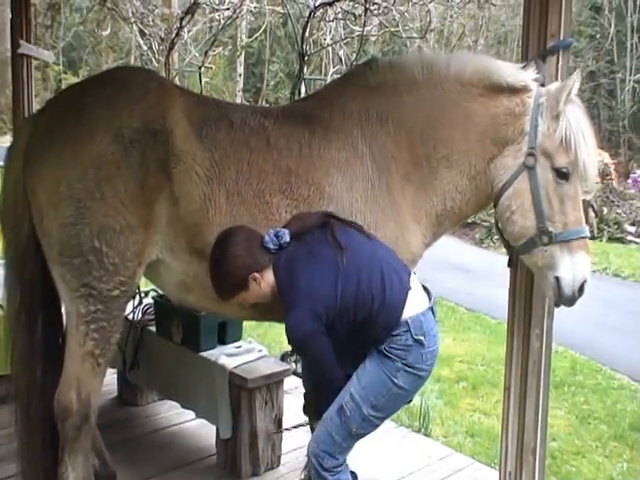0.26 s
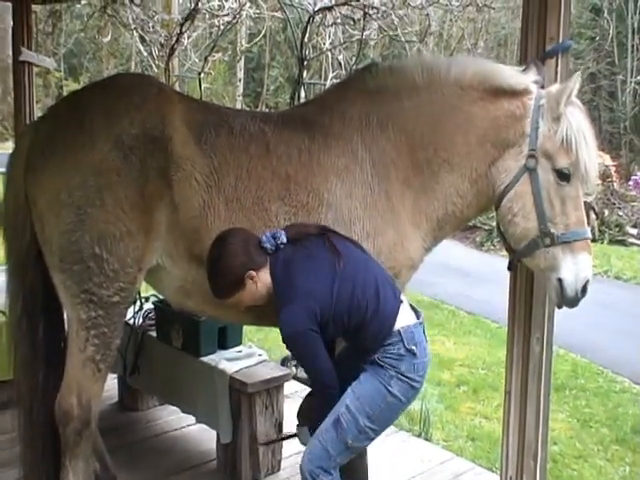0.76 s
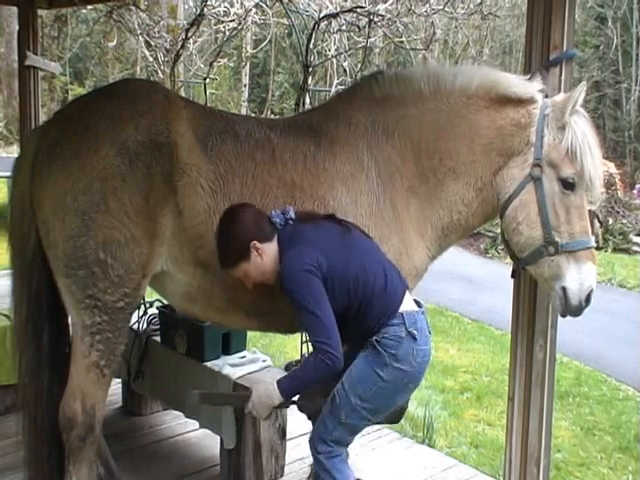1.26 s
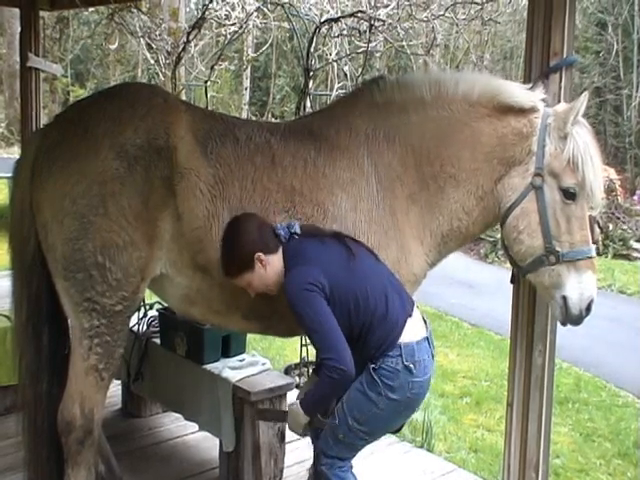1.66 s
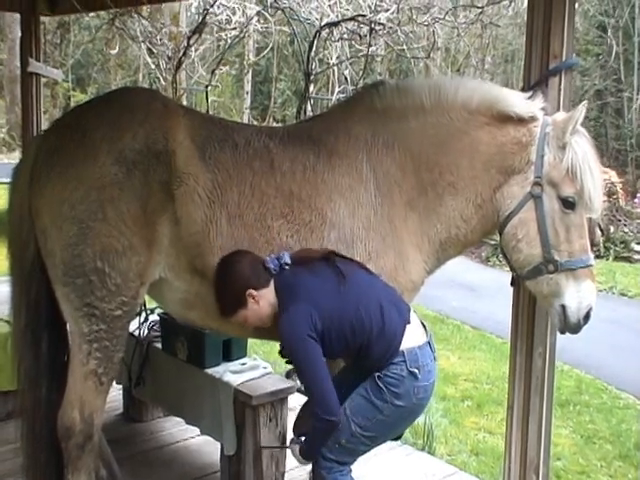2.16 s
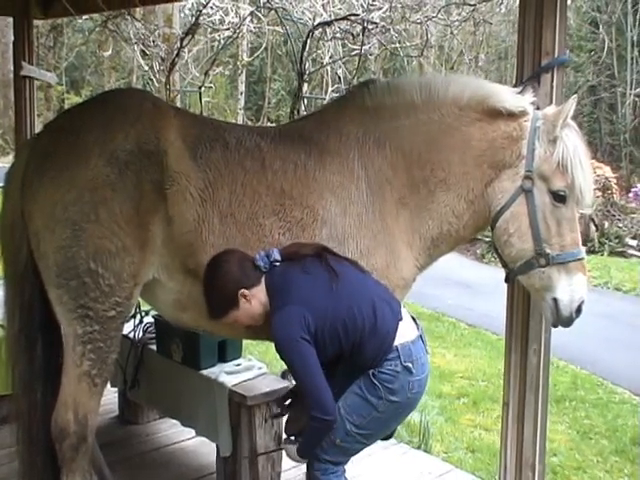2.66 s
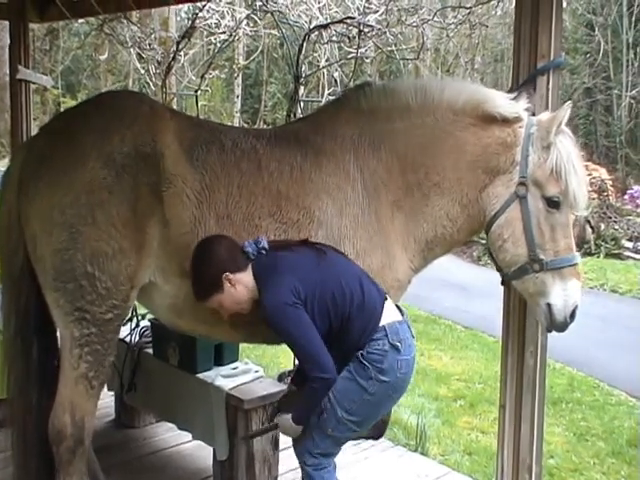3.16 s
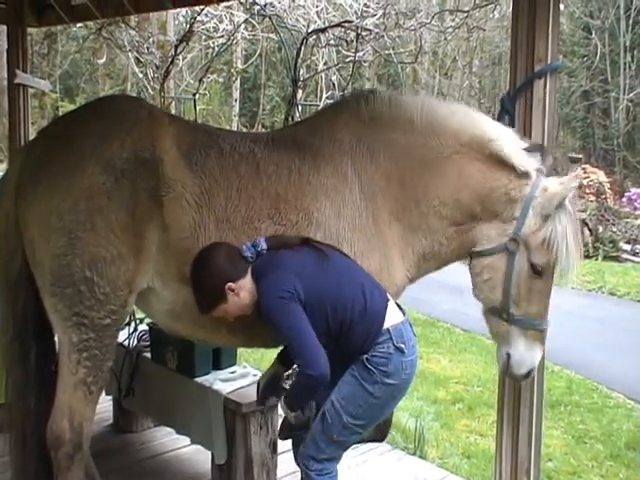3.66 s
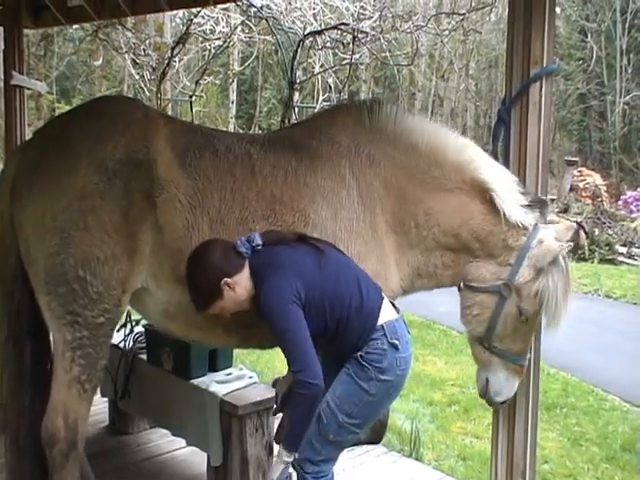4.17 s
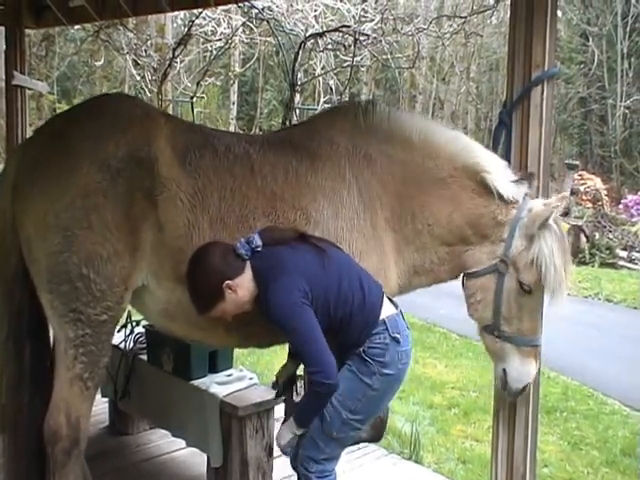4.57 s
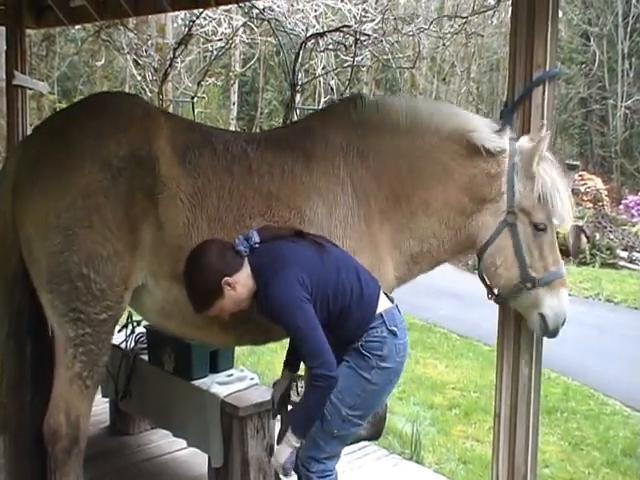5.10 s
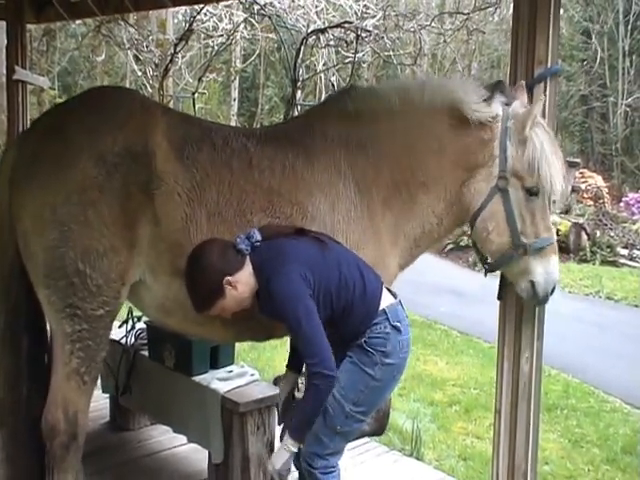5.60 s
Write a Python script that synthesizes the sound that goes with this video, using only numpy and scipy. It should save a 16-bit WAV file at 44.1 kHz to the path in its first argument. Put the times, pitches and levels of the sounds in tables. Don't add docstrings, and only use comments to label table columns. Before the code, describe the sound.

Four sharp hoof thuds on planks with boot shuffles, a quick glove wipe, then gritty metallic filing bursts against quiet outdoor hum.

```python
import sys
import numpy as np
from scipy import signal
from scipy.fft import rfft, irfft, next_fast_len
from scipy.io import wavfile

SR = 44100
rng = np.random.default_rng(int(sys.argv[2]) if len(sys.argv) > 2 else 0)


def wav_record(signal):
    frames = np.transpose(np.atleast_2d(signal))
    bounded = np.clip(frames, -1, 1)
    quanta = np.round(bounded * 32767).astype(np.int16)
    wavfile.write(sys.argv[1], SR, quanta)


def gain_from_decibels(decibels):
    exponent = np.asarray(decibels, float) / 20
    return 10 ** exponent


N = 257544

# [start t/s, swell t/s, fade t/s, grind level/dB, hoof level/dB]
RASP_STROKES = [(3.475, 0.014, 0.028, -60, -69), (3.57, 0.011, 0.025, -61, -74),
                (4.031, 0.081, 0.036, -41, -53.5), (4.15, .02, 0.054, -64, -71),
                (4.295, 0.017, 0.023, -61, -79), (4.435, 0.047, 0.024, -41, -56),
                (4.49, 0.034, 0.054, -41.5, -56), (4.722, 0.01, 0.067, -46.5, -54),
                (4.836, .002, .012, -49, -60), (4.849, .003, 0.011, -47, -62),
                (4.858, 0.0036, 0.019, -44.5, -48), (4.877, 0.0073, 0.015, -42, -59),
                (4.894, 0.02, 0.0097, -42, -48.5), (4.918, 0.017, 0.053, -42.5, -55.5),
                (4.968, 0.013, .014, -53, -60), (4.985, .015, 0.042, -56.5, -64),
                (5.224, 0.0092, 0.029, -50.5, -49), (5.305, 0.043, 0.07, -41, -58),
                (5.36, 0.04, 0.054, -45, -61), (5.635, 0.008, 0.028, -53, -62),
                (5.705, .01, 0.026, -48.5, -61), (5.73, 0.01, 0.015, -49.5, -62),
                (5.745, 0.062, 0.09, -40.5, -56.5)]
# [f/Hz, level/dB per Hz]
GRIND_TONE = [(760, -7.5), (1300, -8), (1740, -6.5), (2700, -0.5), (3530, -6), (4690, -3), (5700, -8.5),
              (7000, -9.5), (9800, -16), (12300, -13), (14400, -23), (15800, -32)]
# [f/Hz, level/dB per Hz]
HOOF_TONE = [(120, -9), (200, -4.5), (483, -3.5), (705, 3), (1010, -8.5), (1290, -9), (1800, -22),
             (2340, -11.5), (3960, -120)]
# [f/Hz, width f/Hz, level/dB]
BAR_MODES = [(1615, 25, -5), (2250, 60, -2), (2550, 50, -4), (3008, 28, -1), (3866, 28, -1), (4640, 40, -8),
             (4768, 30, -1), (5524, 30, -4), (5741, 28, -1), (6660, 40, -12), (6920, 40, -13),
             (7850, 45, -12), (8170, 50, -15), (11600, 70, -16)]
# [t/s, mode f/Hz, peak level/dB, t60 t/s]
TOOTH_CATCHES = [(4.059, 2220, -53.6, 0.07), (4.076, 5741, -43, 0.045), (4.091, 3850, -54, 0.11),
                 (4.092, 4768, -48, 0.04), (4.099, 5524, -53.1, 0.058), (4.101, 5741, -44, 0.049),
                 (4.107, 3008, -51, 0.091), (4.107, 2250, -49, 0.077), (4.115, 4800, -60, 0.051),
                 (4.453, 4800, -55.4, 0.148), (4.472, 5570, -50.9, 0.071), (4.472, 5741, -46, 0.078),
                 (4.489, 4700, -48, 0.04), (4.503, 4720, -51, 0.046), (4.519, 3008, -41, 0.04),
                 (4.533, 2530, -44, 0.04), (4.843, 7850, -55, 0.048), (4.859, 4700, -54.5, 0.04),
                 (4.882, 2550, -50, 0.095), (4.882, 3008, -44, 0.04), (4.901, 2990, -53, 0.157),
                 (4.91, 4768, -57, 0.036), (5.226, 3866, -53.5, 0.1), (5.243, 1615, -48, 0.046),
                 (5.327, 4840, -51, 0.07), (5.346, 3800, -51.5, 0.04), (5.348, 4800, -55, 0.3),
                 (5.357, 5741, -46, 0.067), (5.359, 3040, -53, 0.089), (5.373, 1615, -49.5, 0.12),
                 (5.375, 2180, -59, 0.04), (5.384, 5741, -43, 0.04), (5.39, 4768, -49.8, 0.04),
                 (5.391, 2550, -47.7, 0.058), (5.404, 5524, -40, 0.044), (5.731, 3008, -47, 0.04),
                 (5.75, 3900, -52.7, 0.061), (5.755, 2220, -40.5, 0.046), (5.769, 4768, -48.5, 0.11),
                 (5.772, 2980, -51, 0.135), (5.776, 3866, -44, 0.04), (5.78, 2230, -45, 0.036),
                 (5.8, 3820, -45, 0.04), (5.802, 5524, -52, 0.04), (5.802, 5741, -54.8, 0.04),
                 (5.811, 3008, -53, 0.049), (5.82, 5550, -45, 0.092), (5.819, 5800, -52.2, 0.085)]
# [t/s, mode f/Hz, peak level/dB, t60 t/s]
LIFT_OFF_RINGS = [(4.036, 5741, -57, .15), (4.125, 4768, -60, 0.11), (4.13, 6660, -66, .1),
                  (4.437, 4768, -55, .1), (4.508, 5741, -55, .12), (4.553, 5741, -56, 0.073),
                  (4.557, 3866, -61, 0.14), (4.591, 3866, -64, .15), (4.733, 5741, -63, 0.34),
                  (4.738, 4768, -58, 0.12), (4.727, 3866, -56, 0.15), (4.732, 7850, -68, 0.11),
                  (4.737, 2550, -57, 0.2), (4.851, 5741, -58, .15), (4.924, 2550, -50, 0.14),
                  (4.929, 6660, -61, 0.25), (4.978, 3866, -61, .1), (4.997, 3866, -61, .12),
                  (4.99, 5524, -63, .2), (5.025, 5524, -66, 0.21), (5.226, 4768, -57, .07),
                  (5.232, 5741, -64, .15), (5.644, 4768, -61.5, 0.16), (5.703, 5741, -63, 0.11),
                  (5.72, 3866, -56.5, .2)]
# [t/s, peak level/dB, crack level/dB, joist thump level/dB, contact f/Hz]
HOOF_BLOWS = [
    (0.1628, -12, -10.5, -18, 3960),
    (0.9211, -21, -11, 5.5, 4440),
    (2.4115, -20.5, 0, -18, 4950),
    (2.7909, -13, -18, 3, 3630),
]
# [f/Hz, level/dB, t60 t/s]
BOARD_MODES = [
    [(165.4, -5.5, 0.4), (319, -4.5, 0.22), (371, -8.5, 0.28), (578, -4, 0.18), (633, 2.5, 0.083),
     (966, -9, 0.16), (1230, -15, 0.25), (1566, -17.5, 0.33), (1972, -18, .14)],
    [(380, 4, 0.081), (590, -3.5, 0.082), (698, -0.5, 0.094), (938, -13, 0.14), (1130, -13.5, 0.36),
     (1760, -9, .08)],
    [(161, -3, 0.085), (319, 1, 0.17), (644, -1, 0.13), (900, -2, 0.065), (1460, -18, 0.11)],
    [(155.4, -9.5, 0.43), (228.4, -12, 0.37), (316.5, 0, 0.27), (1360, -24, 0.14), (624, -7, 0.1),
     (716, 11.5, 0.018), (846, -7, 0.11), (1030, -13, 0.12), (1965, -12, .12)],
]
# [f/Hz, level/dB per Hz]
FLOOR_RATTLES = [
    [(59, -35), (100, -10), (183, -7.5), (475, -12.5), (590, -5.5), (1540, -10), (4000, -50), (5200, -80),
     (8800, -120)],
    [(59, -30), (100, -9.5), (923, -12), (2160, -8.5), (2370, -28), (2980, -30), (4000, -44), (5200, -69),
     (8800, -120)],
    [(59, -35), (100, -16), (328, -16), (513, -14.5), (760, -7), (1300, -17), (4000, -26), (5200, -57),
     (8800, -120)],
    [(59, -38), (100, -11), (328, -9), (563, -14), (868, -6.5), (1500, -8.5), (4000, -42), (5200, -79),
     (8800, -120)],
]
# [f/Hz, t60 t/s]
RATTLE_DECAY = [(120, 1), (400, 0.41), (1000, 0.13), (3000, 0.064)]
# [f/Hz, level/dB, t60 t/s]
JOIST_MODES = [(44.8, -18.5, 0.45), (108.7, -9.5, 0.11), (61.6, -11.5, 0.14)]
# [t/s, peak level/dB, low f/Hz, high f/Hz]
EDGE_CLICKS = [
    (0.1626, -34.5, 2200, 5400),
    (2.4112, -28.5, 2400, 5400),
    (2.791, -33, 1300, 2700),
]
# [t/s, peak level/dB, pitch f/Hz, t60 t/s]
WOOD_TAPS = [(0.7335, -36, 698, 0.068), (0.756, -31.5, 217, 0.15), (0.785, -38, 350, 0.097),
             (0.812, -41, 200, 0.062), (0.8775, -33.5, 798, 0.13), (0.957, -29, 334, 0.038),
             (0.984, -35, 201, 0.1), (1.137, -40.5, 207, 0.038), (1.295, -42, 322, 0.03),
             (1.73, -41, 1260, 0.073), (2.449, -52, 202, 0.041), (2.509, -46.5, 393, 0.08),
             (2.682, -45, 259, 0.13), (2.85, -27, 245, 0.059), (2.875, -45, 260, 0.04),
             (3.136, -61, 766, 0.056), (4.4165, -47, 630, 0.038), (5.227, -50, 594, 0.097),
             (5.6415, -41.5, 483, 0.038), (2.783, -31, 485, 0.035), (0.878, -37, 1817, 0.081),
             (0.892, -37, 745, 0.056), (0.7595, -33, 523, 0.046), (0.179, -26.5, 336, 0.018),
             (0.9275, -32, 937, .03), (0.9305, -30.5, 630, 0.02), (0.9445, -35, 300, .025),
             (2.4085, -42, 400, 0.023), (2.4165, -27.5, 643, 0.067), (2.493, -45, 774, 0.067),
             (4.775, -45.5, 380, 0.07), (2.7985, -17.5, 420, 0.019), (2.8055, -29, 393, 0.057),
             (2.833, -31, 416, 0.05), (0.1662, -18, 620, 0.03), (2.931, -46.5, 790, 0.027)]
# [t/s, peak level/dB, low f/Hz, high f/Hz]
STEEL_TICKS = [(0.727, -45, 2400, 3100), (0.7555, -45, 3000, 5200), (1.7283, -46.5, 5930, 7050),
               (2.4125, -50, 2000, 3970), (2.4115, -50, 6300, 7100), (0.1665, -39, 1800, 3200),
               (2.791, -47, 3220, 5600), (2.422, -43, 2500, 5400), (2.7962, -38, 3200, 4700),
               (4.0264, -38, 2950, 14000), (4.0281, -33, 2540, 5600), (4.0296, -35, 3500, 14000),
               (4.278, -43.5, 3050, 9200), (4.7262, -45, 2200, 5000), (4.805, -46, 7500, 13200),
               (4.836, -40.5, 4730, 10000), (4.8375, -36, 5500, 9000), (4.8506, -34.5, 2200, 6500),
               (4.8605, -43, 900, 4000), (5.226, -48, 3020, 5960), (0.9213, -41, 2500, 5200),
               (0.9246, -36, 1500, 3800), (2.4375, -46, 1500, 4200), (2.783, -47, 1000, 3000),
               (2.828, -50, 1200, 3500), (2.852, -45, 1200, 3000), (2.8768, -40, 900, 2800),
               (2.953, -46, 1500, 3000), (4.885, -39, 1800, 6000), (4.9105, -40, 1000, 4000),
               (5.644, -52, 4000, 5000), (4.512, -33.5, 1810, 4000)]
# [start t/s, swell t/s, fade t/s, dull level/dB, bright level/dB]
SOLE_SCUFFS = [(0.168, 0.022, 0.052, -45.5, -64), (0.925, 0.0073, 0.024, -62, -51),
               (2.797, 0.0058, 0.024, -60, -53), (0.98, 0.018, 0.038, -62, -74),
               (0.33, 0.054, 0.054, -60, -59), (0.723, 0.013, 0.021, -43, -48.5),
               (0.756, 0.02, 0.037, -48.5, -71), (0.795, 0.1, 0.017, -46, -66),
               (0.845, 0.065, .008, -62, -59), (1.015, 0.017, 0.018, -61, -52.5),
               (1.11, 0.019, 0.045, -68, -59), (1.25, 0.073, 0.053, -52.5, -51.5),
               (1.40, .04, 0.07, -70, -59.5), (1.67, 0.022, 0.044, -80, -53.5),
               (1.715, 0.019, 0.016, -53.5, -49), (2.02, 0.068, .06, -65, -57.5),
               (2.26, 0.096, 0.045, -56, -55.5), (2.43, 0.016, 0.022, -43.5, -51),
               (2.47, 0.05, 0.015, -45, -51), (2.65, .02, 0.022, -63, -57), (2.70, 0.04, 0.018, -54, -64),
               (2.83, 0.046, 0.06, -49.5, -59.5), (2.89, 0.075, .025, -59, -53.5)]
# [f/Hz, level/dB per Hz]
DULL_TONE = [(88, -31), (150, 2), (561, -5.5), (752, -1.5), (1080, -10), (1780, -13), (2500, -22),
             (3250, -30), (5500, -120)]
# [f/Hz, level/dB per Hz]
BRIGHT_TONE = [(760, -33), (1300, -5), (1780, -5.5), (2050, -5), (3550, -8), (3860, -8.5), (12000, -24.5),
               (15600, -63)]
# [start t/s, swell t/s, fade t/s, level/dB]
WIPES = [
    (0.795, 0.109, .007, -52.5),
    (3.13, 0.0096, 0.084, -57),
    (3.238, 0.072, 0.059, -52.5),
]
# [f/Hz, level/dB per Hz]
WIPE_TONE = [(410, -2.5), (700, -4.5), (1200, -5), (1800, -1.5), (2500, -2.5), (3300, -6), (4500, -10.5),
             (5800, -15.5), (7000, -16.5), (9000, -23), (13000, -23)]
# [start t/s, swell t/s, fade t/s, level/dB]
LEATHER_SQUEAK = [
    (3.25, 0.047, 0.038, -52.5),
]
# [start t/s, swell t/s, fade t/s, level/dB]
CUFF_SWISH = [
    (3.25, 0.06, .12, -63),
]
# [f/Hz, width f/Hz, level/dB]
MACHINE_HUM = [(118.9, 4.7, -55.5)]
# [t/s, level/dB]
DRONE_LEVEL = [(0.0, -62), (0.32, -65.5), (0.88, -55.5), (1.09, -60), (1.36, -62), (2.26, -58), (3.33, -65),
               (3.48, -73), (5.84, -59.5)]
# [start t/s, swell t/s, fade t/s, level/dB]
WIND_GUSTS = [
    (0.6, 0.34, 0.14, -49),
    (1.8, 0.29, .3, -72),
    (2.78, 0.054, 0.12, -41),
    (3.8, 0.35, .3, -76),
    (4.3, .19, 0.23, -66),
    (4.76, 0.034, 0.52, -57),
    (5.6, 0.32, .2, -75),
]
# [f/Hz, level/dB]
MOTOR_WHINE = [(3031, -82), (5970, -89.5), (6029, -86), (8969, -89)]
# [t/s, level/dB]
WHISTLE_LEVEL = [(0, -95), (1.185, -95), (1.19, -77), (5.84, -77)]
# [f/Hz, level/dB per Hz]
AIR_TONE = [(12, -49), (20, -12), (48, -15), (65, -4.5), (122, -4.5), (149, -8.5), (258, -12.5),
            (483, -16.5), (534, -17), (777, -14.5), (2650, -29), (8000, -37), (10400, -104), (17600, -120)]
# [f/Hz, likeness 0..1]
PORT_LIKENESS = [(60, 0.13), (130, 0.64), (290, 0.86), (640, 0.55), (1410, 0.42), (3100, 0.29),
                 (6820, 0.25), (15000, 1)]
# [f/Hz, level/dB]
PORT_BALANCE = [(60, 33), (110, -2), (200, 0.5), (380, 3.5), (700, 3.5), (1290, 6.5), (2380, 8), (4400, 6),
                (8120, 5), (15000, 1)]
# [f/Hz, level/dB per Hz]
MIC_HISS = [(6000, -20), (8500, -3), (11200, -3.5), (11600, 0), (13300, -1.5), (14000, -5), (15300, -5.5),
            (15900, -4)]

STROKE_ENTRY_DB, STROKE_BEND = 10.5, 1.63
BAR_RING_DB, BAR_DAMPING = -13.5, 0.11
SURGE_DB, SURGES_PER_S = 0.23, 16
CATCH_RISE_S = 0.002
WAVE_SPREAD_S, WAVE_LENGTH_S, BODY_LAG_S = 0.000805, 0.00093, 0.00068
RATTLE_DB = -14
SCUFF_ENTRY_DB, SCUFF_BEND = 13, 0.94
TOUCH_S, FADE_DB = 0.004, 10
SQUEAK_HZ, SQUEAK_FALL_HZ_PER_S = 3100, 15000
SWISH_HZ, SWISH_WIDTH_HZ = 5800, 1000
DRONE_HZ, WHISTLE_HZ = 77.6, 15699
AIR_DB, HISS_DB, BREEZE_DB = -54, -68, -72
MIC_TOP_HZ = 15770


def rasp():
    pressure, hoof = gestures(RASP_STROKES, STROKE_ENTRY_DB, STROKE_BEND)
    grind_db = 20 * np.log10(pressure)
    unevenness_db = 1.0 * drift(120) + SURGE_DB * drift(SURGES_PER_S)
    bites = grains(9000, spread_db=2.0) * gain_from_decibels(unevenness_db)
    grind = colour(bites, GRIND_TONE)
    top = filtered(grind, 1, 5000, "high")
    light = 1 - gain_from_decibels(np.minimum(0.8 * (grind_db + 46), 0))
    direct = gain_from_decibels(grind_db - 8.5) * (grind - light * top)
    thud = gain_from_decibels(-0.7) * hoof * colour(bites, HOOF_TONE)
    undamped_db = np.clip(-BAR_DAMPING * (grind_db + 48.0), 0, 8.0)
    force = gain_from_decibels(grind_db + BAR_RING_DB + undamped_db) * bites
    bar = 0
    for hz, width_hz, level_db in BAR_MODES:
        grip = gain_from_decibels(3.0 * drift(18))
        bar = bar + gain_from_decibels(level_db) * resonance(force * grip, hz, 2.2 * width_hz)
    return direct + thud + rms_one(bar) * np.sqrt(np.mean(force ** 2))


def singing_bar():
    out, t = np.zeros(N), np.arange(SR // 4) / SR
    modes = np.array(BAR_MODES)[:, 0]
    for s, near_hz, peak_db, t60 in TOOTH_CATCHES + LIFT_OFF_RINGS:
        hz = modes[np.argmin(np.abs(modes - near_hz))]
        decay = gain_from_decibels(peak_db + 2.5 - 60 * t / max(t60, 0.03))
        rise = 1 - np.exp(-t / CATCH_RISE_S)
        add(out, s, decay * rise * np.sin(2 * np.pi * hz * t))
    return out


def hoof_blows():
    out, t = np.zeros(N), np.arange(SR // 2) / SR
    for blow, modes, spectrum in zip(HOOF_BLOWS, BOARD_MODES, FLOOR_RATTLES):
        s, peak_db, crack_db, thump_db, contact_hz = blow
        knock = boards(modes, t) + gain_from_decibels(crack_db) * plank_crack(contact_hz, t)
        knock = filtered(knock, 6, min(contact_hz, 9000), "low")
        rattle = gain_from_decibels(RATTLE_DB) * floor_rattle(spectrum, t) * np.minimum(t / WAVE_LENGTH_S, 1)
        contact = filtered(knock + rattle, 2, 110, "high")
        add(out, s, gain_from_decibels(peak_db) * (contact + joist_thump(thump_db, t)))
    return out


def boards(modes, t):
    push = np.sin(np.pi * np.clip((t - BODY_LAG_S) / 0.00067, 0, 1)) / 19
    return sum(gain_from_decibels(level_db - 8.0) * ring(push, hz, min(0.5 * t60, 0.2)) for hz, level_db, t60 in modes)


def plank_crack(contact_hz, t):
    chatter = rng.standard_normal(len(t)) * np.exp(-t / 0.00033)
    turns = 1.56 * contact_hz * WAVE_SPREAD_S * t / (t + WAVE_SPREAD_S)
    age = t / WAVE_LENGTH_S
    chirp = np.sin(2 * np.pi * turns) * age * np.exp(1 - age ** 2)
    return 0.33 * signal.lfilter([0.3], [1, -0.7], chatter) + 0.43 * chirp


def floor_rattle(spectrum, t):
    out, edges = 0, 90 * 2 ** np.arange(0, 6.1, 0.5)
    for low, high in zip(edges, edges[1:]):
        hz = np.sqrt(low * high)
        fade_db = -60 * t / at_hz(RATTLE_DECAY, hz)
        swell = 1 - np.exp(-t * hz / 1.3)
        envelope = (gain_from_decibels(4.7 * fade_db) + 0.1 * gain_from_decibels(fade_db)) * swell
        noise = filtered(rng.standard_normal(len(t)), 2, [low, high], "band")
        out = out + gain_from_decibels(at_hz(spectrum, hz)) * noise * envelope
    return out / np.sqrt(np.mean(out[:900] ** 2))


def joist_thump(thump_db, t):
    swell = 1 - np.exp(-(t / 0.019) ** 2)
    return swell * sum(gain_from_decibels(thump_db + level_db - 60 * t / t60) * np.sin(2 * np.pi * hz * t)
                       for hz, level_db, t60 in JOIST_MODES)


def edge_clicks():
    out, click = np.zeros(N), signal.unit_impulse(SR // 4)
    for s, peak_db, low_hz, high_hz in EDGE_CLICKS:
        crack = filtered(click, 5, [low_hz, high_hz], "band")
        add(out, s, gain_from_decibels(peak_db) * crack / np.max(np.abs(crack)))
    return out


def wood_taps():
    out, click = np.zeros(N), signal.unit_impulse(SR // 4)
    spread = rng.normal(0, 1, (len(WOOD_TAPS), 4))
    for (s, peak_db, hz, t60), chance in zip(WOOD_TAPS, spread):
        cluster = ring(click, hz, t60)
        for c in chance:
            cluster = cluster + 0.5 * ring(click, hz * 2 ** (0.57 * c), 0.5 * t60)
        add(out, s, gain_from_decibels(peak_db - 2.5) * filtered(cluster, 2, [0.76 * hz, 4.4 * hz], "band"))
    return out


def steel_ticks():
    out, click = np.zeros(N), signal.unit_impulse(600)
    fade = np.exp(-np.arange(600) / SR / 0.0018)
    for s, peak_db, low_hz, high_hz in STEEL_TICKS:
        burst = rng.standard_normal(600) * fade + 6.1 * click
        tick = filtered(signal.lfilter([1], [1, -0.9], burst), 3, [low_hz, high_hz], "band")
        add(out, s, gain_from_decibels(peak_db) * tick / np.max(np.abs(tick)))
    return out


def scuffs():
    dull, bright = gestures(SOLE_SCUFFS, SCUFF_ENTRY_DB, SCUFF_BEND)
    grit = grains(12000, spread_db=2.0) * gain_from_decibels(1.2 * drift(28))
    soles = gain_from_decibels(-1.0) * dull * colour(grit, DULL_TONE) + gain_from_decibels(-7.0) * bright * colour(grit, BRIGHT_TONE)
    wipes = gestures(WIPES, entry_db=4.0, bend=0.72)[0] * colour(grit, WIPE_TONE)
    return soles + wipes


def glove():
    since = np.arange(N) / SR - LEATHER_SQUEAK[0][0]
    hz = np.clip(SQUEAK_HZ - SQUEAK_FALL_HZ_PER_S * since, 100, 9000)
    squeak = drift(150) * tone(hz)
    swish = resonance(rng.standard_normal(N), SWISH_HZ, SWISH_WIDTH_HZ)
    squeak = gestures(LEATHER_SQUEAK, entry_db=6.0, bend=1.7)[0] * squeak
    return squeak + gestures(CUFF_SWISH, entry_db=2.0, bend=2.1)[0] * swish


def placed(x, left_db, corner_hz):
    low = filtered(x, 1, corner_hz, "low")
    high = x - low
    return np.array([low + gain_from_decibels(left_db * 0.42) * high, low + gain_from_decibels(-left_db * 0.44) * high])


def porch(x, t60, dull_hz):
    size = next_fast_len(N + SR)
    w = 2 * np.pi * np.fft.rfftfreq(size)
    wave, out = rfft(x, size), np.zeros((2, size // 2 + 1), complex)
    dull = 1 / (1 + 1j * w * SR / (2 * np.pi * dull_hz))
    for k, lag in enumerate(rng.uniform(0.006, 0.03, 12) * SR):
        loop = gain_from_decibels(-60 * lag / SR / t60) * dull * np.exp(-1j * w * lag)
        out[k % 2] += wave * loop / (1 - loop) * (-1) ** (k // 2)
    return irfft(out, size)[:, :N]


def far_machine():
    out = gain_from_decibels(curve(DRONE_LEVEL) + 3.0 + 2.9 * drift(6.6)) * tone(DRONE_HZ + 1.41 * drift(3.5))
    for hz, width_hz, db in MACHINE_HUM:
        out = out + gain_from_decibels(db + 1.0 + drift(6.7)) * tone(hz + 0.29 * width_hz * drift(4.2))
    return out


def wind():
    rumble = filtered(rng.standard_normal((2, N)), 2, [28, 62], "band")
    rumble = rms_one(rumble + 1.0 * rumble[0])
    strength = gain_from_decibels(BREEZE_DB) + gestures(WIND_GUSTS, entry_db=23, bend=0.93)[0]
    return gain_from_decibels(1.0) * strength * rumble


def electronics():
    whine = sum(gain_from_decibels(db) * resonance(rng.standard_normal(N), hz, width_hz=14) for hz, db in MOTOR_WHINE)
    whistle = gain_from_decibels(curve(WHISTLE_LEVEL) + 4.5) * np.sin(2 * np.pi * WHISTLE_HZ * np.arange(N) / SR)
    return whine + whistle * gain_from_decibels([[1.5], [-1.5]])


def air():
    leaves = gain_from_decibels(AIR_DB + 0.92 * drift(5.3)) * stereo_noise(AIR_TONE, likeness=1.07)
    return leaves + gain_from_decibels(HISS_DB) * stereo_noise(MIC_HISS, likeness=0.7)


def stereo_noise(spectrum, likeness):
    hz = np.maximum(np.fft.rfftfreq(N, 1 / SR), 1)
    alike = np.clip(likeness * at_hz(PORT_LIKENESS, hz), 0, 1)
    tilt_db = np.clip(at_hz(PORT_BALANCE, hz), -4, 8) / 2
    mid, side = rfft(rng.standard_normal((2, N))) * gain_from_decibels(at_hz(spectrum, hz))
    both = np.sqrt(1 + alike) * mid + np.sqrt(1 - alike) * side * [[1], [-1]]
    return rms_one(irfft(both * gain_from_decibels([tilt_db, -tilt_db]), N))


def gestures(rows, entry_db, bend):
    out = np.full((len(rows[0]) - 3, N), 1e-6)
    for start, swell, fade, *levels_db in rows:
        swell, fade, first = max(swell, 0.002), max(fade, 0.002), round(start * SR)
        t = np.arange(min(int((swell + 8 * fade) * SR), N - first)) / SR
        swelling_db = entry_db * np.abs(1 - t / swell) ** bend
        fading_db = FADE_DB * np.abs((t - swell) / fade) ** bend
        loss_db = np.where(t < swell, swelling_db, fading_db)
        out[:, first:first + len(t)] += gain_from_decibels(np.c_[levels_db] - loss_db) * np.minimum(t / TOUCH_S, 1)
    return out


def grains(per_s, spread_db):
    sizes = gain_from_decibels(spread_db * np.minimum(rng.exponential(1, N), 5)) * rng.choice([-1, 1], N)
    return rms_one(sizes * (rng.random(N) < per_s / SR))


def drift(rate):
    r = np.exp(-80 * np.pi * rate / SR)
    slow = signal.lfilter([1], [1, -2 * r, r * r], rng.standard_normal(N // 40 + 2002))[2000:]
    return np.interp(np.arange(N) / 40, np.arange(len(slow)), rms_one(slow))


def ring(clicks, hz, t60):
    r, w = gain_from_decibels(-60 / (t60 * SR)), 2 * np.pi * hz / SR
    return signal.lfilter([0, np.sin(w)], [1, -2 * r * np.cos(w), r * r], clicks + 1e-18)


def resonance(x, hz, width_hz):
    r, w = np.exp(-np.pi * width_hz / SR), 2 * np.pi * hz / SR
    return rms_one(signal.lfilter([1, 0, -1], [1, -2 * r * np.cos(w), r * r], x))


def tone(hz):
    return np.sin(2 * np.pi * np.cumsum(hz) / SR)


def filtered(x, order, hz, kind):
    return signal.sosfilt(signal.butter(order, hz, kind, fs=SR, output="sos"), x)


def colour(x, spectrum):
    hz = np.maximum(np.fft.rfftfreq(N, 1 / SR), 1)
    return rms_one(irfft(rfft(x) * gain_from_decibels(at_hz(spectrum, hz)), N))


def at_hz(points, hz):
    points = np.array(points)
    return np.interp(np.log(hz), np.log(points[:, 0]), points[:, 1])


def curve(rows):
    return np.interp(np.arange(N) / SR, *np.transpose(rows))


def rms_one(x):
    return x / np.sqrt(np.mean(x ** 2) + 1e-20)


def add(out, s, piece):
    i = round(s * SR)
    out[i:i + len(piece)] += piece[:N - i]


def scene():
    slide = rasp() + singing_bar() + scuffs() + glove()
    wood = hoof_blows() + edge_clicks() + wood_taps() + steel_ticks()
    echo = gain_from_decibels(-25.5) * porch(wood + 1.12 * slide, t60=0.28, dull_hz=5000)
    shared = echo[0] + echo[1]
    near = placed(wood + shared, left_db=8.0, corner_hz=546) + placed(slide, left_db=7.5, corner_hz=436)
    return near + 1.1 * echo + far_machine() + wind() + electronics() + air()


def roll_off(x):
    return signal.sosfilt(signal.butter(12, 16460, fs=SR, output="sos"), x)


def record(dry):
    cut = filtered(dry, 1, 25, "high")
    mix = signal.sosfilt(signal.ellip(14, 0.5, 60, MIC_TOP_HZ, fs=SR, output="sos"), cut)
    return roll_off(mix)


dry = scene()
out = record(dry)
wav_record(out)
```